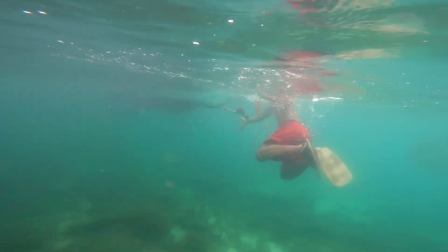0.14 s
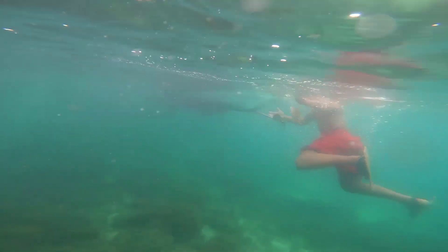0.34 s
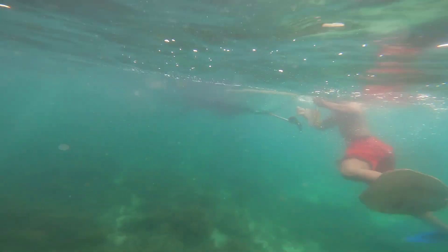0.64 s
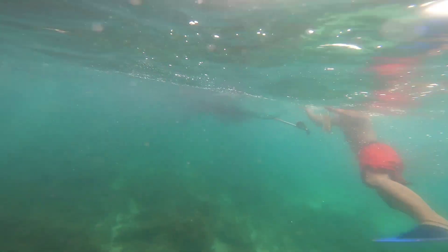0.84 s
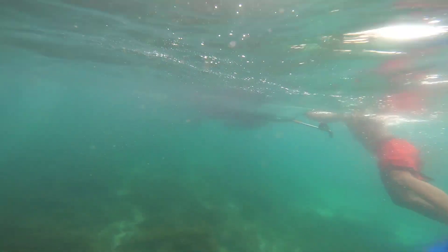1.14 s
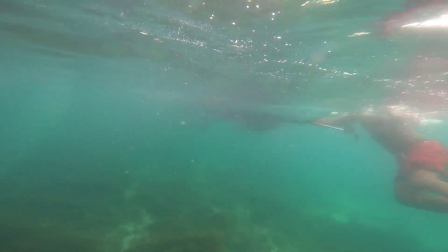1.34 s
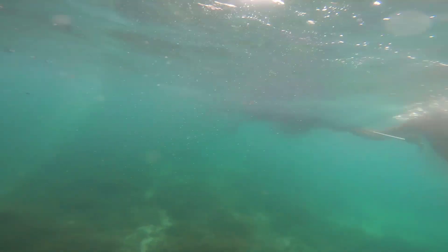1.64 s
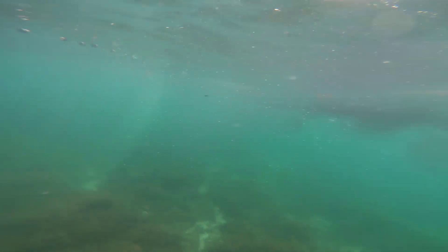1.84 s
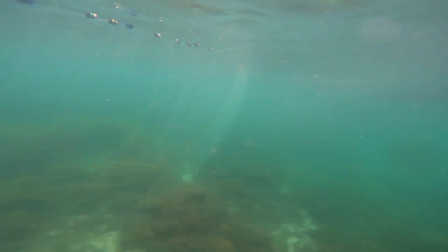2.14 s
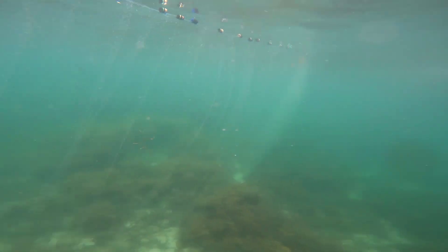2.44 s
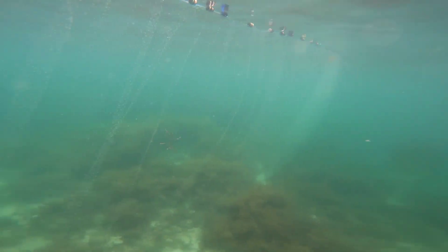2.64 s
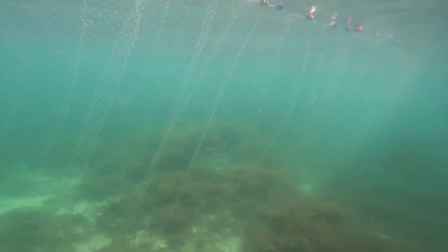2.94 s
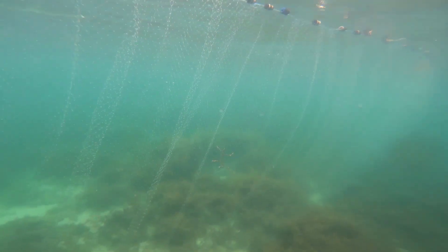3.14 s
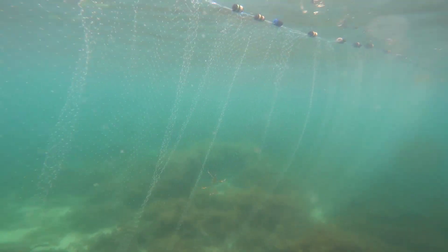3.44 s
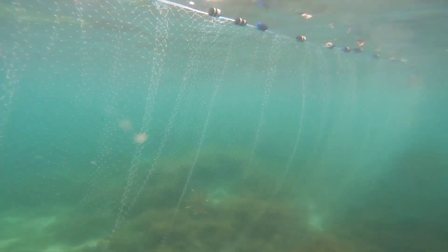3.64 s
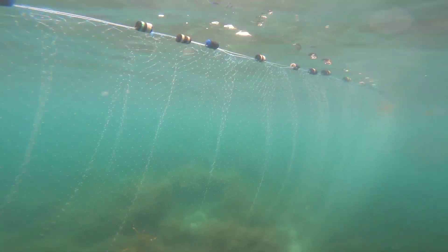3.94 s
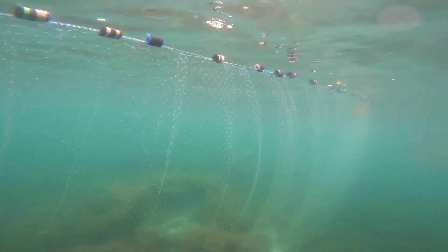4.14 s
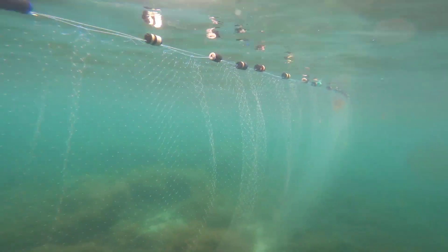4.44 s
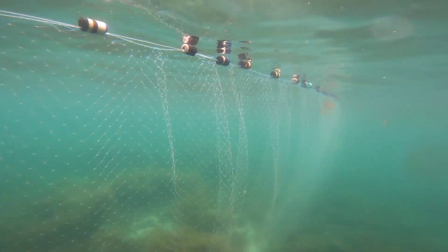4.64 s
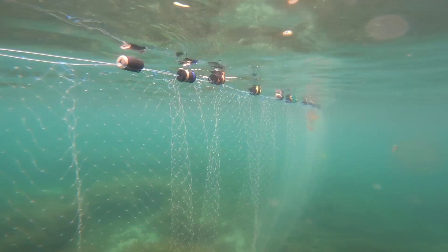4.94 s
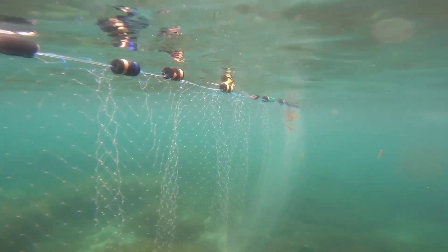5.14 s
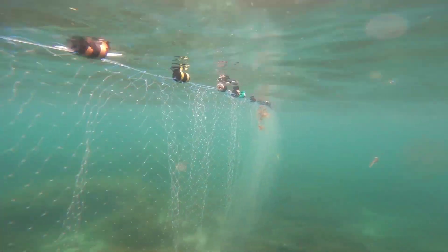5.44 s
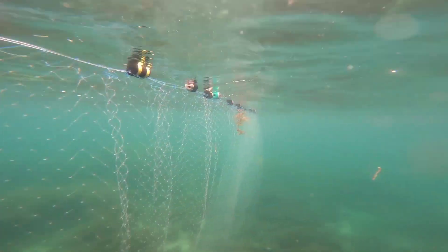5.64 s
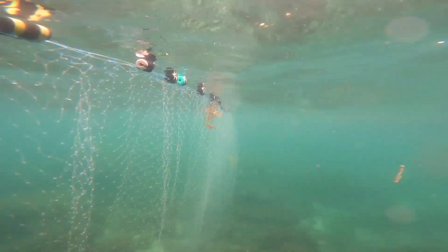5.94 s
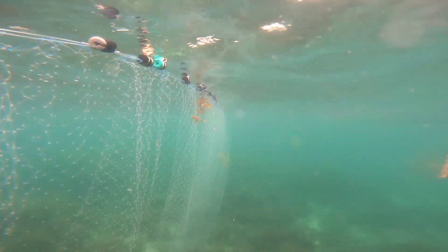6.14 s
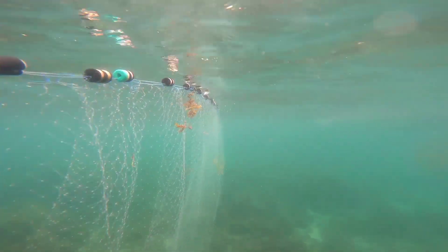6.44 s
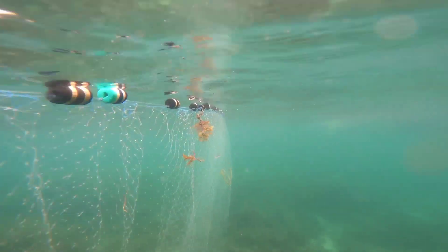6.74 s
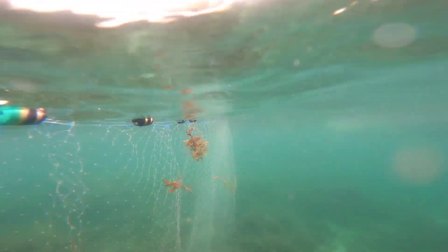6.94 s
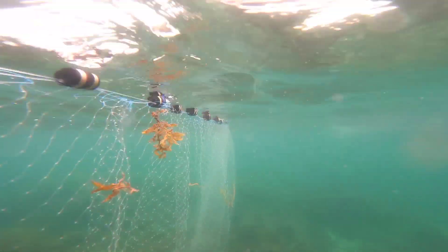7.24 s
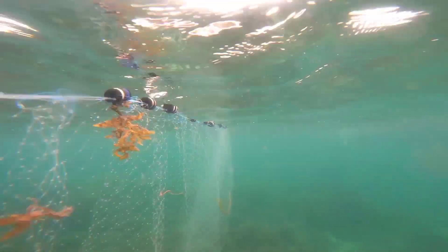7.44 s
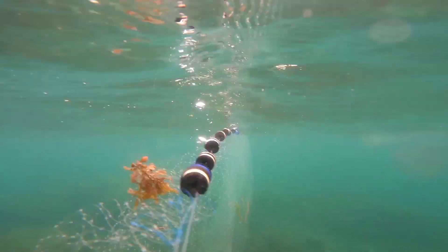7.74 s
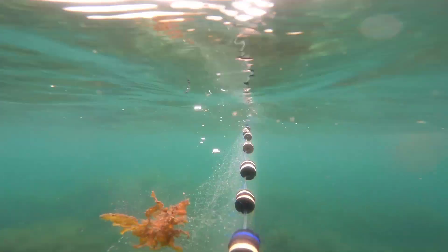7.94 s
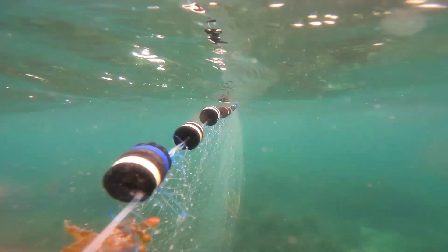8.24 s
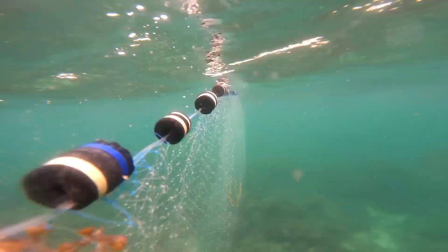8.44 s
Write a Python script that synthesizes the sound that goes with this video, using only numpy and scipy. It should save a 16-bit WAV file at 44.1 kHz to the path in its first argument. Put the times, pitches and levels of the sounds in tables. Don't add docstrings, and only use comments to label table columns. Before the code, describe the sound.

Swimming strokes drag water past an underwater housing in boxy, pulsing surges, over constant fine snapping, as gulps, bubble plops and hard knocks break in.

```python
import sys
import numpy as np
from scipy import signal
from scipy.io import wavfile

SR = 44100
rng = np.random.default_rng(int(sys.argv[2]) if len(sys.argv) > 2 else 0)


def volts_from_db(level):
    exponent = np.asarray(level, float) / 20
    return 10 ** exponent


def to_wav(s):
    ch = np.atleast_2d(s).T
    pcm = np.round(np.clip(ch, -1, 1) * 32767)
    wavfile.write(sys.argv[1], SR, pcm.astype(np.int16))


N = 378378
OPPOSED = np.array([[1], [-1]])


def band(x, low_hz, high_hz):
    return signal.sosfilt(signal.butter(3, [low_hz, high_hz], "band", fs=SR, output="sos"), x)


# (pitch [Hz], width [Hz], level [dB], left minus right [dB], left lead [rad])
CASE_MODES = [(243, 414, -16.5, 5.5, -0.27), (402.8, 55.5, 7, 0.5, 0.21), (442.4, 75.3, 1, 1.5, 0.63),
              (620, 28.7, -11, 6.5, -0.76), (1243, 316, -23.5, -6, 0.45), (1509, 102, -13, 4.5, 0.75),
              (1900, 133, -24.5, 1, -1.5), (2230, 152, -23, 1, 0.23), (3333, 456, -26.5, -1.5, -1.16),
              (4507, 544, -26, -6, 0.18), (4776, 377, -24, -2, 0.76), (5650, 790, -35, -2.5, 0.15),
              (6850, 446, -29, 0.5, 0.55), (9570, 2000, -44, 4.5, -0.5), (12600, 1400, -64, -8, 0),
              (13800, 1500, -72, 3, 6)]


def case(low_hz, high_hz):
    t = np.arange(4096) / SR
    side = OPPOSED / 2
    out = np.zeros((2, len(t)))
    for k, (hz, width_hz, level_db, pan_db, lead_rad) in enumerate(CASE_MODES):
        gain = (-1) ** k * width_hz * volts_from_db(level_db + pan_db * side)
        decay = np.exp(-np.pi * width_hz * t)
        out += gain * decay * np.sin(2 * np.pi * hz * t + lead_rad * side)
    return band(out, low_hz, high_hz)


def through(x, response):
    return signal.oaconvolve(np.atleast_2d(x), response, axes=1)[:, :N]


def drift(rate_hz):
    r = np.exp(-2 * np.pi * rate_hz * 32 / SR)
    noise = rng.standard_normal(N // 32 + 2002)
    slow = signal.lfilter([1], [1, -2 * r, r * r], noise)[2000:]
    return np.interp(np.arange(N) / 32, np.arange(len(slow)), slow / slow.std())


def swells(rows, rise_db_s, fall_db_s, floor_db):
    t = np.arange(0, N + 64, 64) / SR
    power = volts_from_db(2 * floor_db)
    for s, held_s, level_db in rows:
        before_s = np.maximum(s - t, 0)
        after_s = np.maximum(t - s - held_s, 0)
        power = power + volts_from_db(2 * (level_db - rise_db_s * before_s - fall_db_s * after_s))
    return np.interp(np.arange(N) / SR, t, 10 * np.log10(power))


def clicks(times, level_db):
    out = np.full(N, 1e-18)
    np.add.at(out, (np.asarray(times) * SR).astype(int), volts_from_db(level_db))
    return out


def crack(train, tail_s, tail_db):
    r = np.exp(-1 / (tail_s * SR))
    scatter = signal.lfilter([1], [1, -r], np.abs(train)) * rng.standard_normal(N)
    return train + volts_from_db(tail_db) * scatter


def struck(events, parts, tail_s, tail_db, slant):
    times, *levels = np.transpose(events)
    lean = np.interp(np.arange(N) / SR, times, rng.uniform(-0.94, 1, len(times)))
    out = 0
    for level_db, (low_hz, high_hz, trim_db) in zip(levels, parts):
        response = case(low_hz, high_hz)
        blows = crack(clicks(times, level_db + trim_db), tail_s, tail_db)
        out = out + through(blows, response / np.abs(response).max())
    return out * (1 + slant * lean * OPPOSED)


# (time [s], half width [s], depth [dB])
LULLS = [
    (.665, .03, -7),
    (3.625, .035, -11),
    (5.68, .05, -6),
]


def lull_level():
    t = np.arange(N) / SR
    return sum(depth_db * np.exp(-((t - s) / half_s) ** 2) for s, half_s, depth_db in LULLS)


# (full speed [s], held [s], drag [dB], froth [dB], wash [dB])
STROKES = [(0.0, 0.18, -43, -55.5, -46), (.3, 0.23, -50, -79, -48.5), (.9, 0.64, -39, -50, -44.5),
           (1.55, 0.33, -41.5, -50.5, -50), (1.94, 0.37, -34, -47, -40.5), (2.45, 0.33, -55, -46.5, -54.5),
           (2.87, 0.48, -33, -50.5, -39.5), (3.42, .14, -39, -54, -46), (3.7, .1, -40, -56, -47),
           (3.9, 0.33, -34, -47.5, -38), (4.4, 0.7, -72, -51, -45.5), (5.05, 0.43, -41, -51, -47),
           (6.0, 0.24, -40.5, -52, -44), (6.45, .2, -45, -60, -52), (6.9, 0.32, -45.5, -48.5, -44),
           (7.63, 0.017, -37, -37.5, -44), (7.72, 0.14, -43.5, -47.5, -48), (8.15, 0.14, -69, -51.5, -46),
           (8.46, 0.0065, -41, -46, -39)]


def stroke_levels():
    strokes = np.array(STROKES)
    drag_db = swells(strokes[:, [0, 1, 2]], 49, 64.5, -50)
    froth_db = swells(strokes[:, [0, 1, 3]], 53, 73, -64.5)
    wash_db = swells(strokes[:, [0, 1, 4]], 59, 59, -59)
    return drag_db, froth_db, wash_db


def drag(level_db, low_hz, high_hz, lumpy_db, lump_rate_hz, apart):
    response = case(low_hz, high_hz)
    response = response / np.sqrt(np.sum(response.mean(0) ** 2))
    push = volts_from_db(level_db + lumpy_db * drift(lump_rate_hz)) * rng.standard_normal((2, N))
    return through(push[0], response) + apart * through(push[1], response) * OPPOSED


def flow(drag_db, froth_db):
    hum = drag(drag_db - 0.7, 299, 550, lumpy_db=1.6, lump_rate_hz=9, apart=0.04)
    mid_db = 0.58 * drag_db + 0.38 * froth_db - 9.0
    mid_hum = drag(mid_db, 541, 729, lumpy_db=3.5, lump_rate_hz=20.7, apart=0.075)
    hiss = drag(froth_db - 7.0, 780, 1630, lumpy_db=4.5, lump_rate_hz=22, apart=0.11)
    return hum + mid_hum + hiss


def bubbles(level_db, low_hz, high_hz, per_s, cycles, direct):
    sizes = volts_from_db(3.5 * np.minimum(rng.exponential(1, N), 3))
    sizes = sizes * (rng.random(N) < per_s * volts_from_db(2.5 * drift(9)) / SR)
    dealt = rng.integers(0, 16, N)
    out = 0
    for k, hz in enumerate(np.geomspace(low_hz, high_hz, 16)):
        r = volts_from_db(-60 * hz / (cycles * SR))
        w = 2 * np.pi * hz / SR
        ring = [1, -2 * r * np.cos(w), r * r]
        out = out + signal.lfilter([0, np.sin(w)], ring, sizes * (dealt == k) + 1e-18)
    out = band(out, 0.62 * low_hz, 1.07 * high_hz)
    heard = through(out, case(0.74 * low_hz, 1.2 * high_hz))
    heard = heard / heard.std() + direct * out / out.std() * volts_from_db(2.2 * OPPOSED)
    return volts_from_db(level_db) * heard


def gurgle(froth_db):
    return bubbles(froth_db - 3.5, 1094, 2540, per_s=300, cycles=51, direct=0.36)


# (time [s], held [s], level [dB])
HEAVE = [
    (0.28, .05, -42),
    (1.7, 0.13, -43),
    (3.11, 0.037, -46.5),
    (3.9, 0.054, -43.5),
    (4.44, .05, -38),
    (6.04, 1.9, -44),
    (8.12, 0.027, -32),
]


def heave_level():
    return swells(HEAVE, 69, 14, -58.5)


# (pitch [Hz], level [dB])
WASH = [(30, 0), (70, -9), (130, -9), (230, -2.5)]


def heave_and_wash(heave_db, wash_db):
    out = 0
    edges_hz = [(12, 42), (42, 100), (100, 170), (170, 300)]
    for (low_hz, high_hz), (_, trim_db) in zip(edges_hz, WASH):
        mid, side = band(rng.standard_normal((2, N + SR)), low_hz, high_hz)[:, SR:]
        level_db = heave_db if low_hz < 30 else wash_db
        gain = volts_from_db(level_db + trim_db + 0.88 * drift(12.0)) / mid.std()
        out = out + gain * (mid + 0.085 * side * OPPOSED)
    return out * volts_from_db(0.35 * OPPOSED)


def reef():
    far = 0
    for low_hz, high_hz in [(1400, 3600), (2900, 5600), (5000, 21000), (4200, 8000)]:
        sizes = volts_from_db(5.5 * np.minimum(rng.exponential(1, N), 2.4)) * rng.choice([-1, 1], N)
        train = sizes * (rng.random(N) < 220 / 4 * volts_from_db(3 * drift(3)) / SR)
        far = far + band(crack(train, tail_s=0.0027, tail_db=-16.5), low_hz, high_hz)
    far = through(far, case(940, 17000))
    blur = drag(-60.5, 1140, 12000, lumpy_db=4.0, lump_rate_hz=27, apart=0.53)
    return volts_from_db(-59.5) * far / far.std() + blur


# (time [s], middle level [dB], dull level [dB], bright level [dB])
SNAPS = [(0.0333, -23.5, -23, -42.5), (0.3649, -26.5, -36, -40), (1.0695, -12.5, -30, -32.5),
         (1.292, -26, -37, -60), (2.148, -31, -45, -39.5), (2.4214, -29.5, -25.5, -38),
         (2.5202, -26.5, -31, -67), (2.7172, -29, -25, -39), (2.9807, -35, -46, -37.5),
         (3.256, -23, -22, -52), (3.3293, -16, -40, -31), (3.5292, -21, -23, -48),
         (3.6551, -21, -19.5, -43.5), (3.7189, -24, -28, -45), (3.7833, -28, -26, -50),
         (3.8626, -24.5, -28.5, -64), (4.0831, -20, -29, -57), (4.7371, -25.5, -52, -36.5),
         (4.9511, -27, -18.5, -48), (5.9178, -13, -26, -39), (6.2467, -27, -34, -35),
         (6.6687, -24, -29, -35.5), (7.1591, -32.5, -35, -38.5), (7.3028, -33, -57, -33.5),
         (7.3545, -59.5, -65.5, -37), (7.4774, -21.5, -33, -54), (7.7427, -27, -23.5, -30.5),
         (8.1506, -24.5, -35, -42.5), (8.2243, -21, -36, -42.5)]
# (time [s], level [dB], bright level [dB])
FAINT = [(0.104, -45, -51), (0.3505, -41.5, -45), (0.4408, -46, -62), (0.4544, -35, -50), (1.02, -40, -51),
         (1.6904, -43, -47), (1.8098, -34, -45), (1.8786, -34, -53), (2.634, -34, -61), (2.85, -36, -53),
         (2.9098, -35, -49), (3.0565, -40, -64), (3.4366, -39, -72), (3.468, -37, -67), (3.497, -39, -59),
         (3.5673, -38, -63), (3.6618, -30, -42), (3.7514, -46, -54), (3.767, -38, -49.5),
         (3.8167, -38, -54), (3.83, -38, -51), (3.913, -37, -54), (3.9978, -30, -59), (4.4363, -33, -53),
         (4.6284, -39, -51), (4.707, -40, -44.5), (5.15, -40, -61), (5.2208, -39, -59), (5.8636, -34, -52),
         (6.0563, -33.5, -56), (6.1484, -33.5, -49), (6.395, -41, -70), (6.516, -49, -47.5),
         (6.8568, -50, -53), (6.9564, -38, -40.5), (7.2573, -40, -44.5), (7.4165, -36, -43),
         (7.5518, -36, -52), (7.662, -40, -55), (7.7054, -42, -41), (7.8166, -38, -46),
         (7.8934, -57, -46.5), (7.9658, -40, -52), (8.101, -43, -55), (8.119, -33, -40), (8.1843, -35, -45),
         (8.256, -40, -48.5), (8.446, -33, -49), (8.515, -41, -43.5)]
# (time [s], level [dB])
POPS = [(0.1645, -34.5), (0.5738, -32.5), (0.7974, -27.5), (1.1774, -30.5), (1.193, -24.5), (1.4007, -32),
        (1.8258, -32.5), (2.3032, -24), (2.385, -29.5), (2.6763, -28), (2.766, -23.5), (3.0864, -25),
        (3.1627, -25), (3.1901, -27), (3.3583, -28.5), (3.4029, -29.5), (3.7414, -30), (4.1041, -19),
        (4.2877, -18), (5.0275, -30.5), (5.233, -26), (6.0686, -36), (6.1654, -25), (6.1758, -23.5),
        (7.5657, -20), (8.372, -24), (8.4637, -24)]
# (time [s], level [dB])
TICKS = [(0.4853, -33), (0.9238, -37), (0.9822, -27), (1.054, -37), (1.475, -29), (1.5256, -26),
         (1.5574, -33), (1.7275, -36), (1.9193, -32), (1.95, -26.5), (2.2558, -30.5), (2.4454, -31.5),
         (2.7008, -32), (2.8027, -33), (2.8918, -35), (3.3049, -27.5), (3.3174, -27), (3.6097, -32.5),
         (3.9769, -37), (4.2268, -34), (4.3231, -26), (4.722, -40), (4.8047, -33), (4.9077, -24.5),
         (5.7309, -31.5), (5.8062, -35), (5.8283, -32.5), (6.3215, -31.5), (6.9456, -37), (7.2826, -32.5),
         (8.2741, -40)]


def all_snaps():
    pop_db, tick_db = np.array([-10, 1, -25.5]), np.array([1.5, -10, -15])
    pops = [(s, *(db + pop_db)) for s, db in POPS]
    ticks = [(s, *(db + tick_db)) for s, db in TICKS]
    faint = [(s, db, db - 14, bright_db) for s, db, bright_db in FAINT]
    return np.array(sorted(SNAPS + pops + ticks + faint))


def shrimp():
    snaps = all_snaps()
    parts = [(2095, 4900, -3.0), (1127, 2880, -3.0), (5330, 9160, 6.0)]
    near = struck(snaps, parts, tail_s=0.0029, tail_db=-17.5, slant=0.25)
    edge = clicks(snaps[:, 0], snaps[:, 3] - 2.5)
    left, right = [band(crack(edge, tail_s=0.0025, tail_db=-8.5), 7900, 15300) for port in range(2)]
    return near + [left, 0.7 * np.roll(right, 1)]


# (time [s], level [dB])
THROBS = [(0.186, -34), (0.85, -29), (1.11, -31), (1.153, -33), (1.307, -29), (1.623, -31), (1.882, -27),
          (1.999, -22), (2.066, -23), (2.125, -23), (2.164, -24), (2.221, -24), (2.778, -28), (2.864, -22),
          (2.887, -24), (2.921, -22), (2.977, -22), (3.009, -17), (3.065, -21), (3.112, -21), (3.183, -25),
          (3.246, -22), (3.294, -24), (3.771, -25), (3.819, -26), (3.979, -29), (4.227, -29), (4.544, -37),
          (5.021, -32)]
# (time [s], level [dB], pitch [Hz])
SURGES = [(1.04, -26, 407), (1.709, -27.5, 420), (2.837, -29, 410), (3.447, -27, 393), (4.109, -19, 410),
          (4.87, -31.5, 383), (6.035, -27, 420), (6.064, -21.5, 396), (6.078, -24, 396),
          (6.117, -10.5, 398), (6.145, -8.5, 431), (6.156, -9.5, 418), (6.181, -13.5, 420),
          (6.206, -24, 415), (6.226, -17.5, 435), (7.655, -26, 430), (7.681, -14, 434), (7.7, -17.5, 440),
          (7.719, -19.5, 446), (7.782, -20, 436), (7.8, -23, 458), (7.82, -29, 443), (7.93, -29.5, 460),
          (8.136, -27.5, 422), (8.407, -27.5, 415)]


def surges():
    rows = SURGES + [(s + 0.005, db - 2.5, 408) for s, db in THROBS]
    t = np.arange(SR // 20) / SR
    shape = np.exp(-((t - 0.006) / 0.0069) ** 2)
    pushes = np.zeros(N + SR)
    for s, level_db, hz in rows:
        at = int((s - 0.006) * SR)
        pushes[at:at + len(t)] += volts_from_db(level_db - 1.0) * np.sin(2 * np.pi * hz * t) * shape
    response = case(180, 870)
    reference = through(np.sin(2 * np.pi * 412 * t) * shape, response)
    return through(pushes, response) / np.abs(reference).max()


def ringing_air(table, pan_db, lag_s):
    t = np.arange(SR // 4) / SR
    out = np.zeros((2, N + SR))
    wobbles = rng.uniform(0, 1, (len(table), 2))
    for (s, level_db, hz, t60_s, *glide), (speed, start) in zip(table, wobbles):
        wobble = 1 + 0.25 * np.sin(2 * np.pi * ((40 + 50 * speed) * t + start))
        sine = np.sin(2 * np.pi * hz * (t + (0.27 + sum(glide) / 2) * t ** 2))
        decay = volts_from_db(level_db + 2.5 - 60 * t / max(t60_s, 0.01))
        attack = 1 - np.exp(-t * hz / 1.6)
        tone = sine * decay * attack * wobble
        late = np.interp(t - lag_s, t, tone)
        at = int(s * SR)
        out[:, at:at + len(t)] += [tone * volts_from_db(pan_db), late * volts_from_db(-pan_db)]
    return out[:, :N]


# (time [s], level [dB], pitch [Hz], t60 [s], optional glide [1/s])
GULPS = [(0.576, -43.5, 1080, 0.12), (2.09, -28, 627, 0.063), (2.478, -31.5, 1120, 0.048),
         (2.683, -35, 1050, 0.047), (4.726, -34, 645, 0.077), (6.106, -14, 610, 0.04),
         (6.249, -40.5, 653, 0.11), (6.709, -26.5, 611, 0.13), (7.122, -27, 1350, 0.021),
         (7.174, -35.5, 915, 0.08), (7.236, -25.5, 1180, 0.022), (7.434, -17, 710, 0.019),
         (7.497, -32, 700, 0.082), (7.537, -20.5, 1065, 0.075), (7.649, -21.5, 683, 0.045),
         (7.697, -21, 790, 0.027), (7.785, -20, 636, 0.072), (7.883, -24.5, 1123, 0.057),
         (8.03, -26, 564, 0.022), (8.062, -26.5, 753, 0.1), (8.291, -15, 1133, 0.039),
         (8.3, -25, 950, 0.11, -1.6), (8.394, -32, 1080, 0.06, -4), (8.464, -14.5, 1114, 0.061)]


def gulps():
    return ringing_air(GULPS, pan_db=2.0, lag_s=0.00006)


# (time [s], level [dB], pitch [Hz], t60 [s])
BUMPS = [
    (1.375, -26.5, 182.3, 0.18),
    (2.2745, -8, 438, 0.063),
    (5.8, -42, 233, 0.186),
    (6.7, -36.5, 177, 0.11),
    (6.912, -22.5, 111, 0.052),
    (7.84, -30, 90.5, 0.28),
    (8.452, -22.5, 134, 0.11),
]


def bumps():
    return ringing_air(BUMPS, pan_db=1.0, lag_s=0.00003)


# (time [s], level [dB], pitch [Hz], t60 [s])
BLIPS = [(1.3775, -38, 1280, 0.034), (1.4272, -31, 1400, 0.032), (1.4974, -28, 1415, 0.036),
         (1.8093, -42, 1220, 0.083), (4.9378, -27.5, 1520, 0.027), (5.2037, -28.5, 1516, 0.1),
         (6.1814, -28.5, 1454, 0.082), (6.8146, -34, 1430, 0.019), (6.9631, -30.5, 1496, 0.033),
         (7.0439, -48, 1420, 0.034), (7.2664, -35.5, 1860, 0.032), (7.8385, -28, 1340, 0.035),
         (8.0627, -21, 1264, 0.021), (8.2142, -36, 1410, 0.017), (8.4933, -26, 1290, 0.024)]


def blips():
    return ringing_air(BLIPS, pan_db=2.0, lag_s=0.00004)


# (time [s], ring level [dB], thud level [dB], rattle level [dB])
KNOCKS = [(2.278, -31, -26, -43), (3.531, -22.5, -40, -21), (4.158, -22, -46, -52), (6.107, -14, -31, -30),
          (6.132, -12, -31, -42), (7.234, -25, -38.5, -23.5), (7.436, -43, -51, -38),
          (7.536, -26, -32, -32), (7.59, -19, -37, -18.5), (7.622, -0.5, -20.5, -32), (7.635, -8, -25, -16),
          (8.245, -20.5, -41, -22.5), (8.291, -16.5, -27, -13), (8.46, -32, -32, -30)]


def knocks():
    times, ring_db, thud_db, rattle_db = np.transpose(KNOCKS)
    t = np.arange(4096) / SR
    wall = 9 * np.sin(2 * np.pi * 490 * t) * np.exp(-t / 0.025) * volts_from_db(1.5 * OPPOSED)
    damped = (case(68, 1460) + wall) * np.exp(-t / 0.013)
    damped = signal.lfilter(*signal.butter(2, 1150, fs=SR), damped)
    ring_db = np.minimum(ring_db, -6.5)
    rung = through(clicks(times, ring_db + 0.18), damped / np.abs(damped).max())
    rattle_rows = np.transpose([times, rattle_db])
    rattle = struck(rattle_rows, [(696, 2550, -6.0)], tail_s=0.0052, tail_db=-30.0, slant=0.043)
    squeeze = band(np.eye(1, 4096)[0], 44, 380)
    thud = through(clicks(times, thud_db + 6.0), np.array([squeeze, squeeze]) / squeeze.max())
    return rung + rattle + thud


def slosh_level():
    return swells([(s, 0, thud_db - 18) for s, _, thud_db, _ in KNOCKS], 900, 185, -89.5)


# (time [s], level [dB], pitch [Hz], t60 [s], glide [1/s])
PLOPS = [(2.3, -51, 1380, 0.034, -13), (2.33, -33, 1440, 0.057, -5), (2.35, -33, 1090, .04, -2),
         (2.655, -34, 1440, .04, 0), (6.062, -35, 1020, 0.029, 0), (6.085, -36, 1500, .03, 2),
         (6.107, -29, 1500, 0.05, -4), (6.107, -22, 1020, 0.022, 3), (6.133, -23, 730, 0.039, -1),
         (6.172, -35, 1480, .04, 2), (6.235, -31, 650, 0.069, -10), (6.585, -42, 1060, 0.054, 5),
         (6.635, -34, 630, 0.069, -2), (6.888, -44, 900, .04, 0), (7.06, -35, 615, 0.067, -1),
         (7.062, -39, 1520, .06, 0), (7.07, -40, 1040, .04, 4), (7.213, -33, 1440, .03, -2),
         (7.366, -30, 1140, .02, 0), (7.396, -38, 1540, 0.072, -1), (7.452, -42, 1500, .05, -2.5),
         (7.55, -32, 643, 0.14, -0.5), (7.578, -32, 650, 0.091, -0.5), (7.588, -26, 1080, 0.044, 5),
         (7.623, -21, 1400, 0.035, -1), (7.635, -27, 1120, 0.073, -6.5), (7.647, -33.5, 1550, 0.097, 1),
         (7.669, -24, 1000, 0.027, -1), (7.747, -29.5, 1463, 0.054, 1), (7.768, -27, 1175, 0.065, 3),
         (7.858, -29, 1400, .05, 0.5), (8.009, -38, 755, 0.028, 0), (8.296, -33, 2210, .04, -7.5),
         (8.297, -34, 1544, 0.023, -1), (8.368, -35, 1290, .03, 2), (8.397, -42, 2400, 0.062, -5),
         (8.44, -30.5, 1414, 0.06, -2.5), (8.551, -42, 1300, .03, 0)]


def plops():
    return ringing_air(PLOPS, pan_db=2.5, lag_s=0.00005)


# (time [s], level [dB], pitch [Hz], t60 [s])
SQUEAKS = [(5.505, -40.5, 2230, 0.027), (6.068, -36.5, 3680, 0.023), (8.062, -36, 2160, 0.035),
           (8.13, -34.5, 3500, 0.018), (8.15, -30, 6850, 0.022), (8.185, -33, 4540, 0.031),
           (8.19, -44, 2230, 0.11), (8.236, -37, 3340, 0.035), (8.256, -38, 4470, 0.025),
           (8.292, -33, 2390, 0.025), (8.395, -30, 2090, 0.022), (8.463, -22, 3200, 0.018)]


def squeaks():
    return ringing_air(SQUEAKS, pan_db=1.8, lag_s=0.00002)


# (time [s], held [s], level [dB])
SPLASHES = [
    (6.11, 0.11, -46),
    (6.95, .45, -58),
    (7.55, 0.15, -43.5),
    (7.74, 0.19, -46),
    (8.295, 0.0031, -41.5),
    (8.4, 0.1, -57),
]


def splashes():
    level_db = swells(SPLASHES, 505, 282, -88)
    return bubbles(level_db, 524.4, 1671, per_s=140, cycles=30, direct=1.0)


# (time [s], held [s], level [dB])
FLURRY = [
    (7.6, 0.11, -59),
    (8.11, .02, -53),
    (8.19, 0.052, -52.5),
    (8.27, .005, -49.5),
]


def flurry():
    level_db = swells(FLURRY, 505, 450, -110)
    return bubbles(level_db, 3230, 5000, per_s=380, cycles=77, direct=0.2)


def scene():
    drag_db, froth_db, wash_db = stroke_levels()
    wash_db = 10 * np.log10(volts_from_db(2 * wash_db) + volts_from_db(2 * slosh_level()))
    lull_db = lull_level()
    drag_db, froth_db, wash_db = drag_db + lull_db, froth_db + lull_db, wash_db + lull_db
    water = flow(drag_db, froth_db) + heave_and_wash(heave_level(), wash_db) + surges()
    air = gurgle(froth_db) + gulps() + bumps() + blips() + plops() + squeaks() + splashes() + flurry()
    return water + reef() + shrimp() + air + knocks()


def low_pass(x):
    return signal.sosfilt(signal.butter(12, 15350, fs=SR, output="sos"), x)


def record(dry):
    return low_pass(dry)


dry = scene()
out = record(dry)
to_wav(out)
```